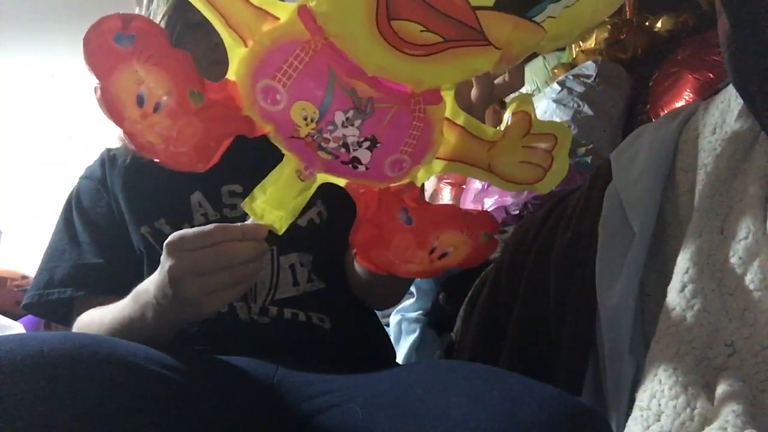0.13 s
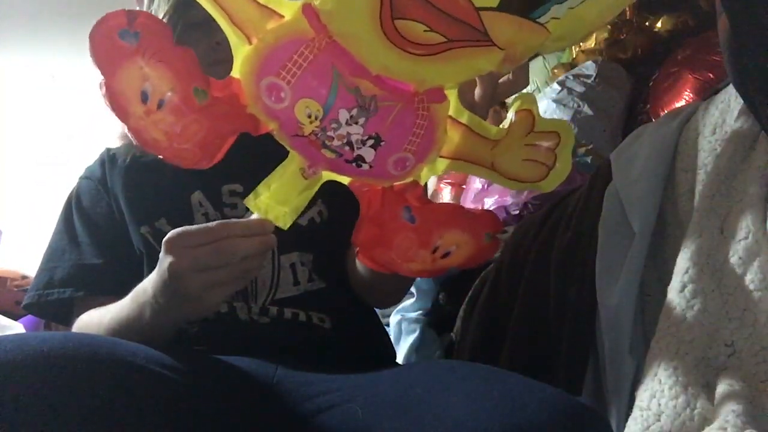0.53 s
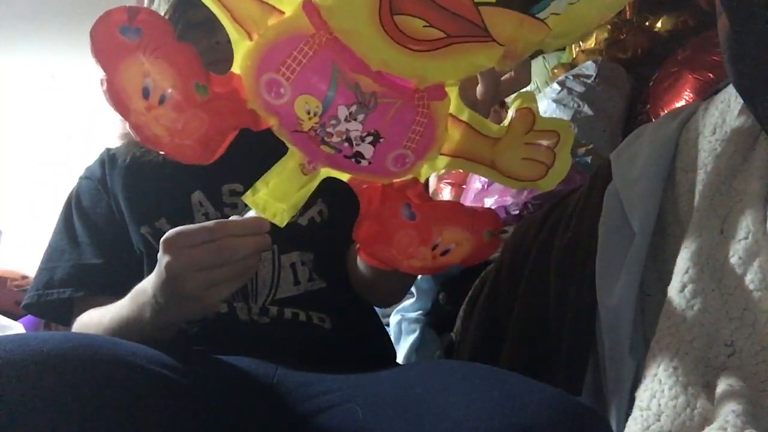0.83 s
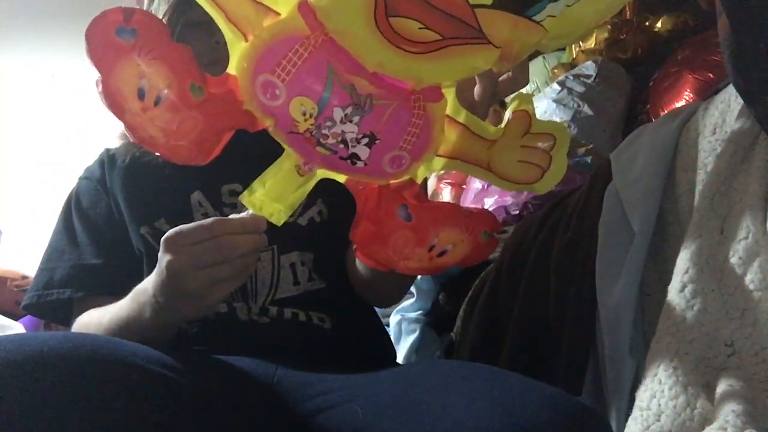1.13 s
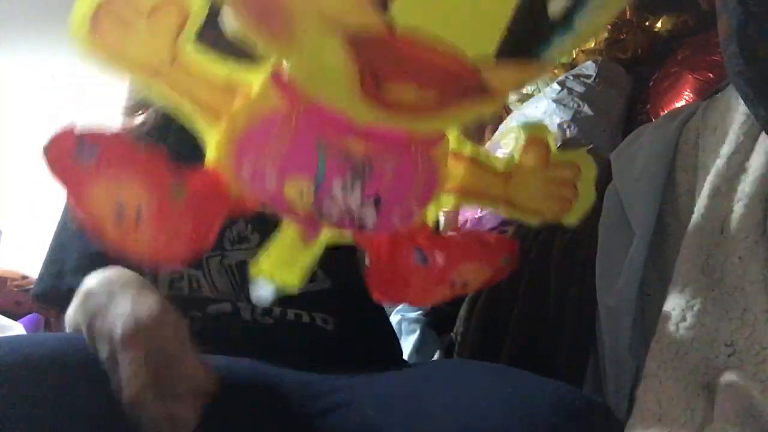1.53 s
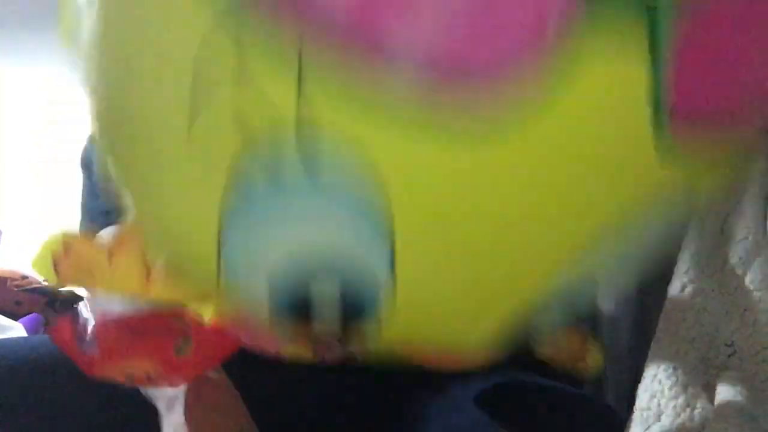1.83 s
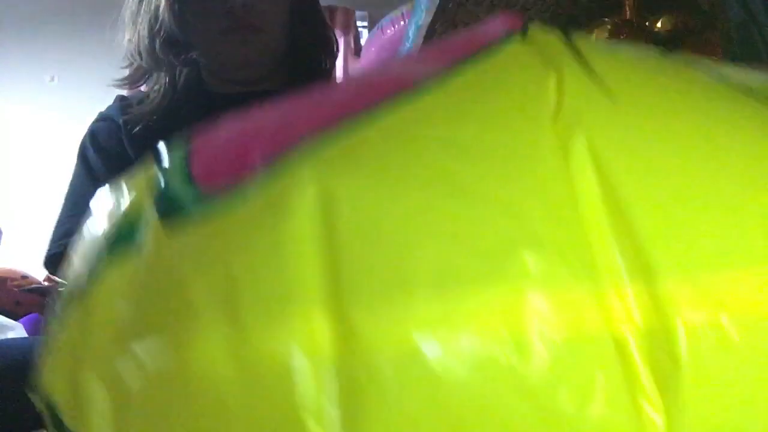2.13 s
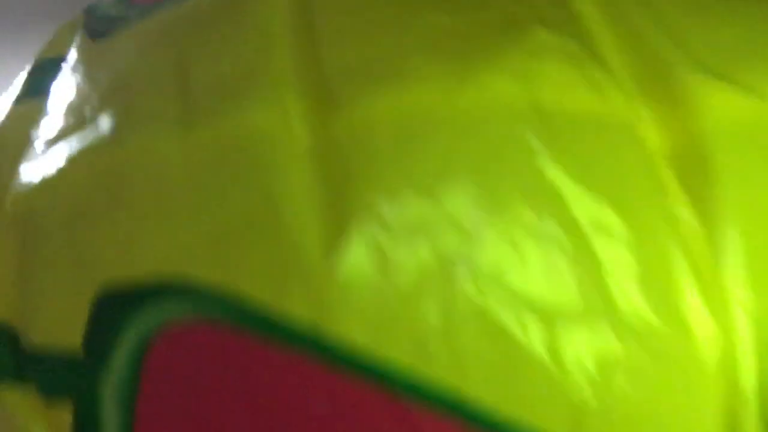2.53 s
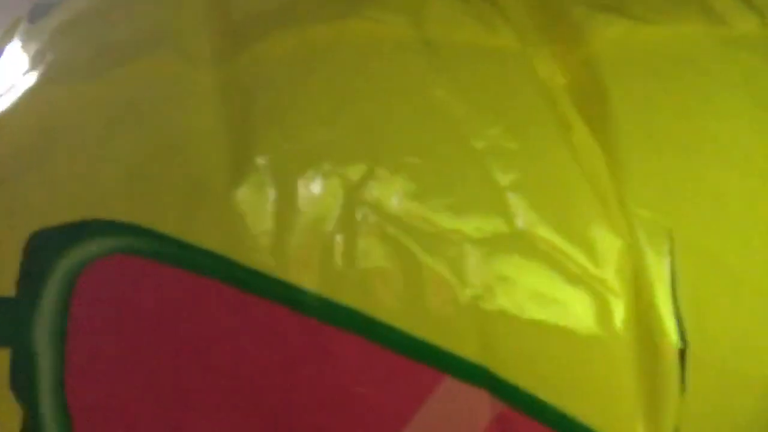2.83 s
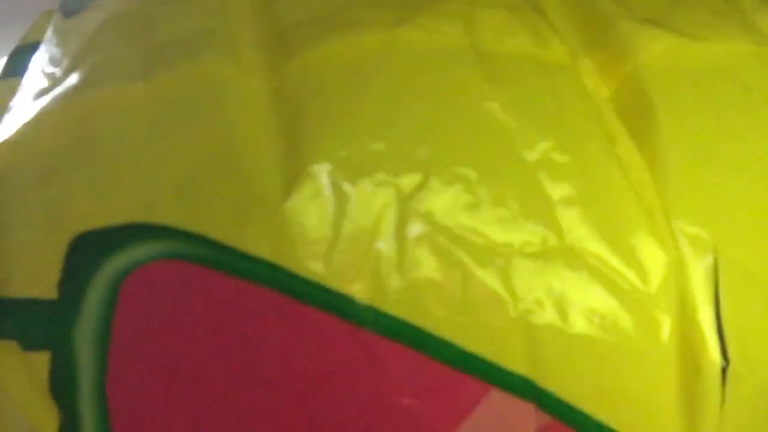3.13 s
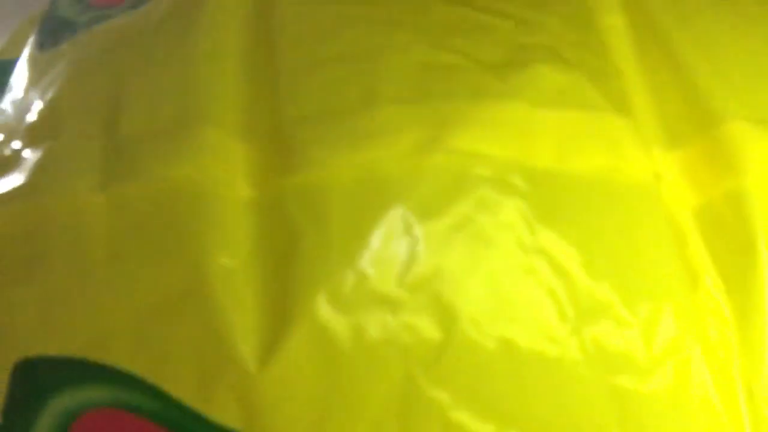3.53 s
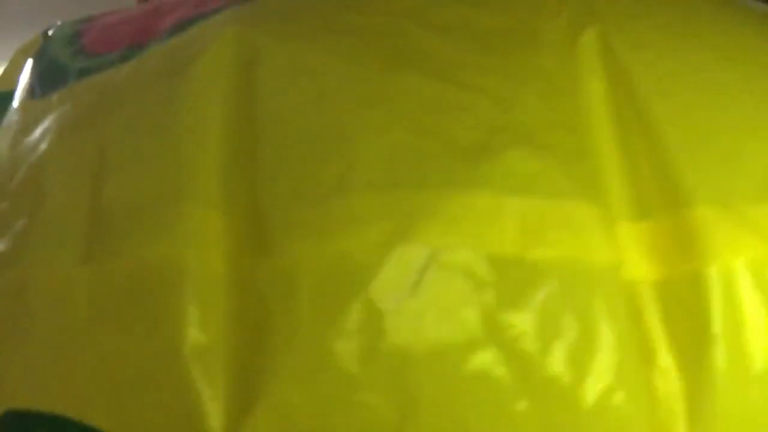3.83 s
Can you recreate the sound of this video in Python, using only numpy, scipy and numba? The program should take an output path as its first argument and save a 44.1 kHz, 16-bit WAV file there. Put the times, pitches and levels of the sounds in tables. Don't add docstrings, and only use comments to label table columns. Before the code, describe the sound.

Crinkly foil balloon ticks quietly, swings closer, thuds into the microphone, then rubs and crackles

```python
import sys
import numpy as np
from scipy import signal
from scipy.fft import rfft, irfft
from scipy.io import wavfile
from scipy.ndimage import uniform_filter1d
from numba import njit

SR = 44100
rng = np.random.default_rng(int(sys.argv[2]) if len(sys.argv) > 2 else 0)


def amplitude_ratio(level_db):
    exponent = np.asarray(level_db, float) / 20
    return 10 ** exponent


def store_wav(level_fs):
    pcm = np.round(np.clip(np.atleast_2d(level_fs), -1, 1) * 32767)
    wavfile.write(sys.argv[1], SR, pcm.T.astype(np.int16))


N = 176400

STAGGER_S, RISE_CYCLES = .003, .6


def unit(x):
    return x / np.sqrt(np.mean(x ** 2))


def coloured(x, points):
    points_hz, points_db = np.array(points, float).T
    hz = np.maximum(np.arange(N // 2 + 1) * SR / N, 1)
    gain_db = np.interp(np.log(hz), np.log(points_hz), points_db, left=-50)
    return unit(irfft(rfft(x) * amplitude_ratio(gain_db), N))


def walk(rate_hz):
    hold = int(SR / rate_hz)
    levels = np.repeat(rng.standard_normal(N // hold + 1), hold)
    return 1.31 * uniform_filter1d(uniform_filter1d(levels, hold), hold)[:N]


@njit
def rings(n, sr, start, hz, t60, size, rise):
    y = np.zeros(n)
    for k in range(len(start)):
        turn = np.exp(2j * np.pi * hz[k] / sr - np.log(1000.) / (t60[k] * sr))
        fade = np.exp(-hz[k] / sr / rise)
        z, still = size[k] + 0j, 1.
        first = max(int(start[k] * sr), 0)
        for i in range(first, min(first + int(t60[k] * sr), n)):
            y[i] += z.imag * (1 - still)
            z *= turn
            still *= fade
    return y


def room_hum():
    # hz, db_per_hz
    room_spectrum = [(30, -2.5), (60, -1), (130, -3.5), (300, -15), (1000, -17.5), (5000, -26),
                     (16000, -37.5)]
    level_db = -65
    return coloured(rng.standard_normal(N), room_spectrum) * amplitude_ratio(level_db - 6 + 1.5 * walk(6))


def hand_gains():
    # time_s, rustle_db, contact_db
    hand_moves = [(0, -70, -69), (.55, -70, -70), (.9, -76, -70), (1.28, -75, -72), (1.68, -62, -66),
                  (1.95, -63, -68.5), (2.1, -61, -59), (2.4, -51.5, -52), (2.72, -59, -56),
                  (2.79, -69, -67), (3.0, -59.5, -59), (3.07, -75.5, -70.5), (3.24, -74.5, -68),
                  (3.35, -62, -61), (3.6, -66.5, -59), (4, -62, -63)]
    s, rustle_db, contact_db = np.array(hand_moves, float).T
    t = np.arange(N) / SR
    return amplitude_ratio(np.interp(t, s, rustle_db)), amplitude_ratio(np.interp(t, s, contact_db))


def stroke_gains():
    # start_s, length_s, level_db, brightness_db
    rub_strokes = [(.12, 0.064, -72, 7), (0.223, 0.16, -73, 7), (1.4, .17, -62, 8), (1.427, 0.056, -55, 4),
                   (1.971, .1, -55.5, -3), (2.112, .05, -46, 0), (2.17, .043, -41, 3),
                   (2.23, .11, -43.5, 1.5), (2.348, 0.049, -48.5, 0), (2.461, .08, -48, -5),
                   (2.673, 0.037, -51.5, -2.5), (2.839, .04, -47, -4), (2.898, .05, -45, -1),
                   (3.255, 0.058, -54, -10), (3.33, 0.073, -55.5, -1.5), (3.419, .15, -53.5, -2),
                   (3.63, 0.083, -53, -2), (3.719, 0.066, -49.5, -2), (3.819, 0.15, -53.5, -3)]
    attack_s, release_s = 0.0097, .014
    t = np.arange(N) / SR
    dull, bright = np.zeros(N), np.zeros(N)
    for s, length_s, db, bright_db in rub_strokes:
        onset = np.clip((t - s) / attack_s, 0, 1)
        shape = onset * np.exp(-np.maximum(t - s - length_s, 0) / release_s)
        dull += (shape * amplitude_ratio(db)) ** 2
        bright += (shape * amplitude_ratio(db + bright_db)) ** 2
    return np.sqrt(dull), np.sqrt(bright)


def contact_rumble(contact, dull):
    # hz, db_per_hz
    rumble_spectrum = [(15, -38), (25, -10), (65, 4.5), (158, -3), (274, -5), (500, -13.5), (650, -34),
                       (1100, -120)]
    hold_db, stroke_db = -1.5, -8
    shake = np.hypot(contact * amplitude_ratio(hold_db), dull * amplitude_ratio(stroke_db)) * amplitude_ratio(3.1 * walk(14))
    return coloured(rng.standard_normal(N), rumble_spectrum + [(900, -66)]) * shake


def gas_booms():
    # time_s, pitch_hz, level_db, t60_s
    jolts = [
        (0.969, 85.5, -60, 0.35),
        (2.14, 61.6, -40, 0.28),
        (2.29, 74.6, -46, .2),
        (2.87, 92, -48, 0.66),
    ]
    s, hz, db, t60 = np.array(jolts, float).T.copy()
    return rings(N, 1. * SR, s, hz, t60, amplitude_ratio(db), 2.2)


def rustle():
    # hz, db_per_hz
    skin_spectrum = [(88, -27), (150, -0.5), (275, -2), (484, -4.5), (905, -4), (1020, -4.5), (4860, -17.5),
                     (6640, -15.5), (16000, -43.5)]
    per_s, modes, scatter_db, loudest_db = 300, 12, 5.2, 11
    t60_s = .011
    hiss_db = -3
    u = rng.random((int(per_s * N / SR), 3, modes))
    crease_db = np.minimum(-scatter_db * np.log(1 - u[:, 0, :1]), loudest_db)
    db = crease_db + 18 * u[:, 2]
    khz = .2 * 78 ** np.sqrt((np.arange(modes) + u[:, 1]) / modes)
    start = u[:, 0, 1:2] * N / SR + STAGGER_S * u[:, 0] ** 3
    t60 = t60_s / np.sqrt(khz)
    size = amplitude_ratio(db) * khz ** .6
    swarm = rings(N, 1. * SR, start.ravel(), 1000 * khz.ravel(), t60.ravel(), size.ravel(), RISE_CYCLES)
    hiss = amplitude_ratio(hiss_db + 2.7 * walk(24.99)) * rng.standard_normal(N)
    both = coloured(unit(swarm) + hiss, skin_spectrum)
    low = signal.sosfiltfilt(signal.butter(1, 2500, fs=SR, output="sos"), both)
    return low, both - low


def buckle(s, db, part, count, slope_db=0):
    low_hz, high_hz, t60_s, part_db = part
    u = rng.random((len(s), 4, count))
    hz = low_hz * (high_hz / low_hz) ** ((np.arange(count) + u[:, 0]) / count)
    start = s[:, None] + STAGGER_S * u[:, 1] ** 2
    mode_db = db[:, None] + slope_db * np.log2(hz / low_hz) + part_db - 10 * np.log10(count)
    size = amplitude_ratio(mode_db + 6.5 * (u[:, 2] - .5)) * np.sign(u[:, 3] - .5)
    t60 = t60_s * (0.59 + 0.79 * u[:, 3])
    return rings(N, 1. * SR, start.ravel(), hz.ravel(), t60.ravel(), size.ravel(), RISE_CYCLES)


def creases():
    # time_s, tick_db, thump_db, ring_db
    held = [(0.0024, -40, -64.5, -56.5), (0.167, -46.5, -78, -73), (0.2944, -56, -68, -60),
            (0.3613, -52, -62, -54.5), (0.4221, -47, -65.5, -62), (0.487, -45, -67, -58.5),
            (0.5511, -50, -66.5, -63), (0.573, -47, -69, -60), (0.6749, -54, -69, -56),
            (0.701, -44.5, -67, -62), (0.7545, -44, -67, -54), (0.8165, -60, -65, -58),
            (0.854, -48.5, -63, -58), (0.9786, -49, -63, -58), (0.9908, -44, -63, -60),
            (0.9943, -35.5, -61, -60), (1.0114, -44, -66, -58), (1.043, -55, -62, -55.5),
            (1.1258, -46, -56.5, -58)]
    swung = [(1.3064, -49, -53, -56.5), (1.3164, -38.5, -48, -51), (1.4451, -31, -48.5, -46),
             (1.4774, -48, -56, -53), (1.6048, -39.5, -50, -50.5), (1.736, -37.5, -58.5, -52),
             (1.7734, -39.5, -54, -46), (1.7843, -41.5, -56, -47.5), (1.8372, -41.5, -56, -48),
             (1.8761, -49, -59, -50.5), (1.915, -46, -62, -48.5), (1.9294, -55, -62, -51),
             (1.9879, -42, -56, -57), (2.0073, -41, -52, -52), (2.0343, -44, -53, -42),
             (2.0497, -32.5, -52, -39.5)]
    bumped = [(2.1121, -29.5, -44, -36), (2.1385, -25, -41, -36.5), (2.1484, -24, -40, -38),
              (2.1654, -33, -40, -34), (2.2034, -28, -42, -33.5), (2.2074, -22.5, -46.5, -36.5),
              (2.2214, -35, -44, -40), (2.2478, -36, -46, -48), (2.3296, -31.5, -43, -36),
              (2.3575, -38, -48, -47), (2.4149, -40, -50, -47), (2.4683, -41, -44, -46.5),
              (2.5052, -44, -46, -45), (2.5774, -44, -50, -48.5), (2.6165, -40, -48.5, -45.5),
              (2.6804, -43, -49.5, -47.5), (2.6938, -41, -47.5, -56), (2.7317, -52, -52.5, -43.5),
              (2.7546, -45, -55, -56)]
    pressed = [(2.8057, -42.5, -49, -53), (2.8619, -39, -50, -39.5), (2.9841, -41, -59, -55),
               (2.9941, -37.5, -57, -51.5), (3.1718, -44, -60, -53.5), (3.2815, -50, -53, -53),
               (3.3653, -36.5, -56, -54), (3.4206, -34.5, -52, -43), (3.4284, -38, -51, -50),
               (3.471, -52, -55, -45), (3.4974, -43, -55, -49), (3.5144, -45, -57, -58),
               (3.5332, -44, -54, -44), (3.555, -42, -51.5, -47.5), (3.6474, -37, -52, -49),
               (3.6678, -45, -54, -48), (3.7055, -36.5, -53.5, -50), (3.8862, -35, -52, -47),
               (3.907, -33.5, -53, -44.5), (3.931, -39, -51, -50), (3.9614, -54, -51, -43.5)]
    # low_hz, high_hz, t60_s, level_db
    thump_part = (202, 803, .024, 12)
    ring_part = (850, 2396, .013, 10.5)
    snap_part = (2570, 5560, .008, -2.2)
    tick_part = (5498, 15500, .006, 1.5)
    s, tick_db, thump_db, ring_db = np.array(held + swung + bumped + pressed, float).T
    thump = buckle(s, thump_db, thump_part, count=4)
    ring = buckle(s, ring_db, ring_part, count=5)
    snap = buckle(s, tick_db, snap_part, count=6)
    tick = buckle(s, tick_db, tick_part, count=16, slope_db=-9.5)
    return thump + ring + snap + tick


def with_echo(foil):
    echo_db, t60_s = -12, .12
    tail = np.arange(int(.2 * SR)) / SR
    echo = rng.standard_normal(len(tail)) * amplitude_ratio(-60 * tail / t60_s)
    echo *= tail > .003
    echo /= np.sqrt(np.sum(echo ** 2))
    return foil + amplitude_ratio(echo_db) * signal.fftconvolve(foil, echo)[:N]


def scene():
    touch, contact = hand_gains()
    dull, bright = stroke_gains()
    low, high = rustle()
    rubbing = low * np.hypot(touch, dull) + high * np.hypot(touch, bright)
    foil = with_echo(creases() + rubbing)
    mix = room_hum() + contact_rumble(contact, dull) + gas_booms() + foil
    return mix[None]


def low_pass(x):
    return signal.sosfilt(signal.butter(12, 16480, fs=SR, output="sos"), x)


def record(dry):
    top_cut = signal.ellip(8, .2, 60, 16100, fs=SR, output="sos")
    mix = signal.sosfilt(top_cut, dry)
    return low_pass(mix)


dry = scene()
out = record(dry)
store_wav(out)
```